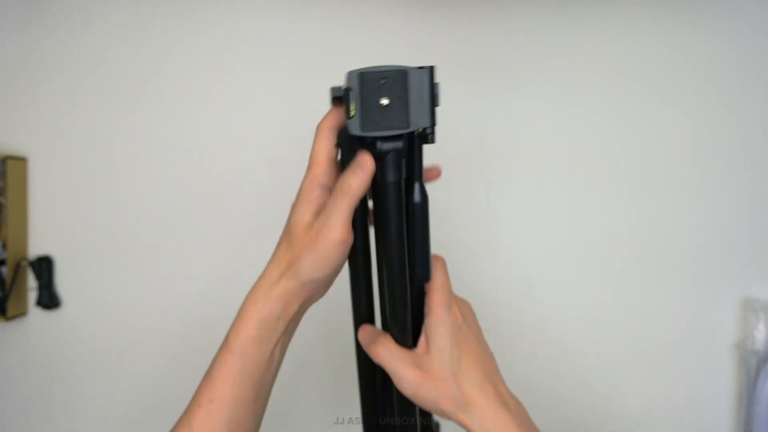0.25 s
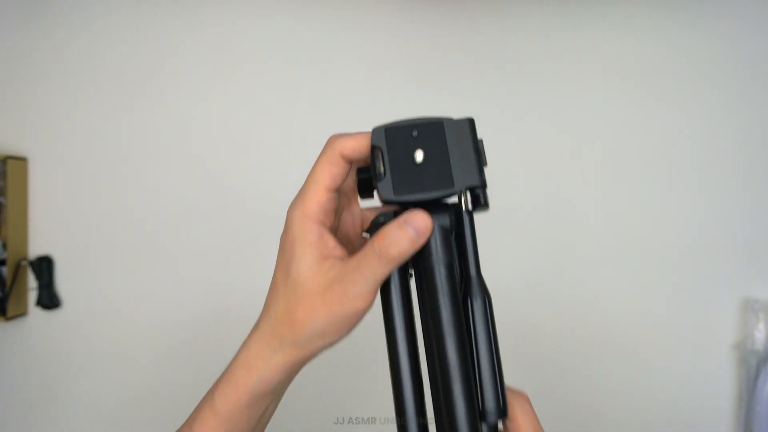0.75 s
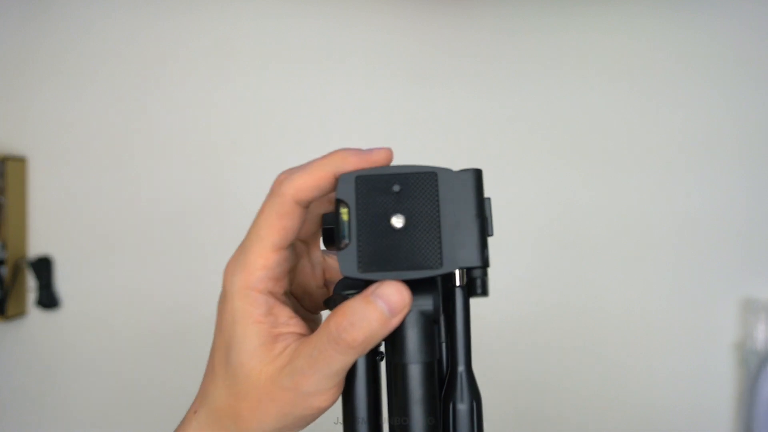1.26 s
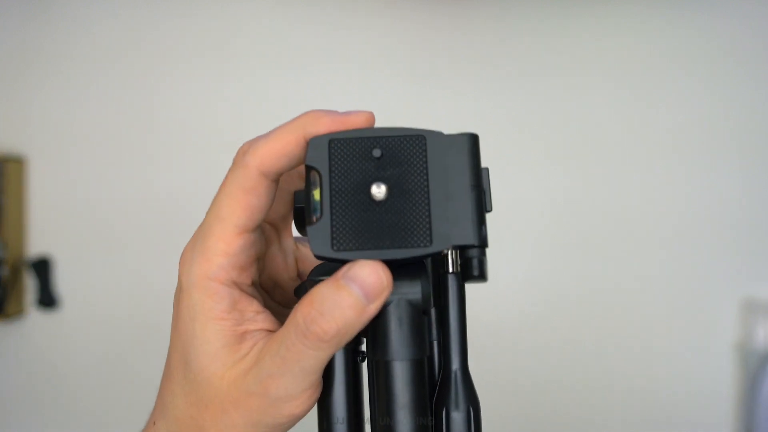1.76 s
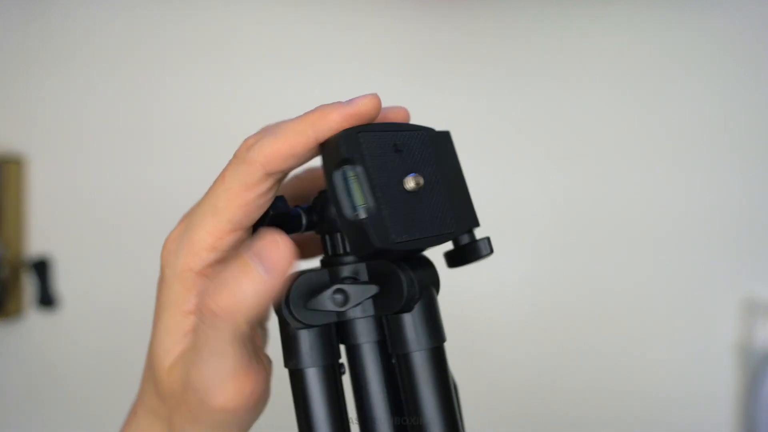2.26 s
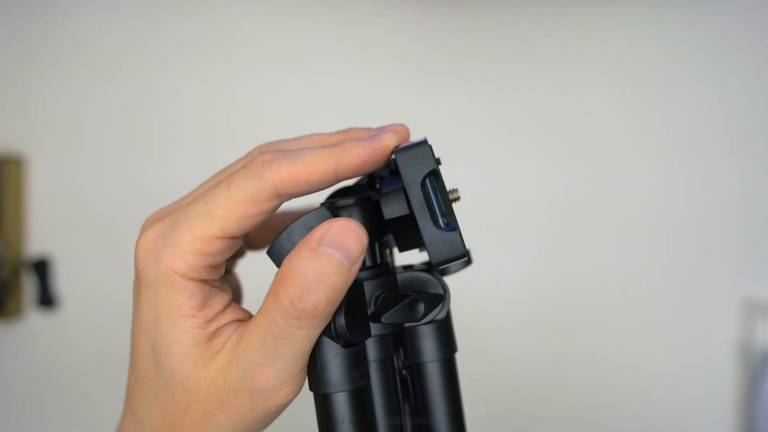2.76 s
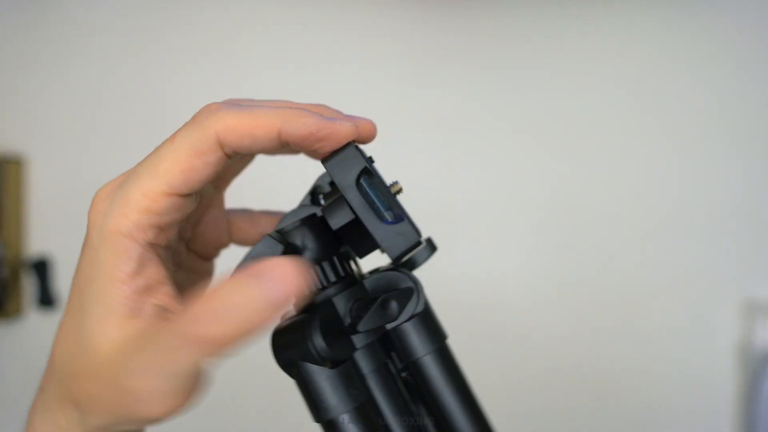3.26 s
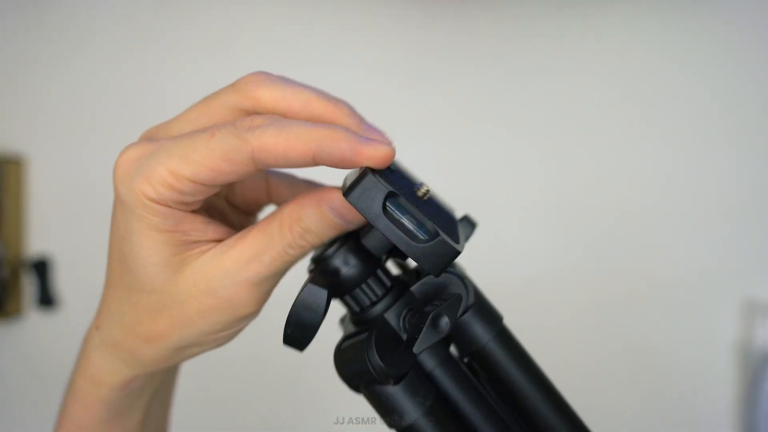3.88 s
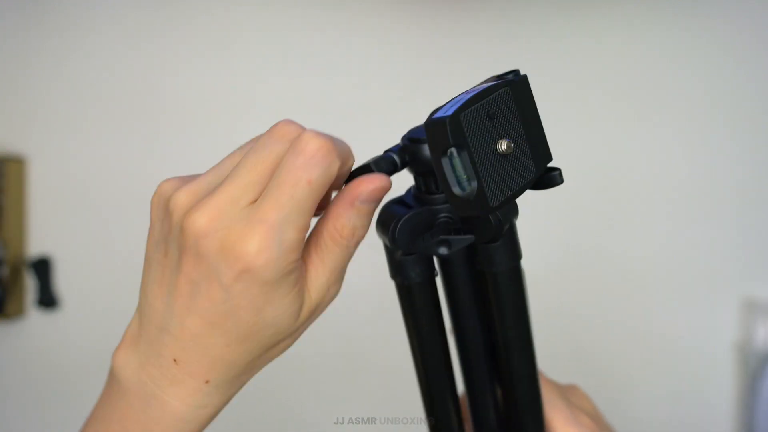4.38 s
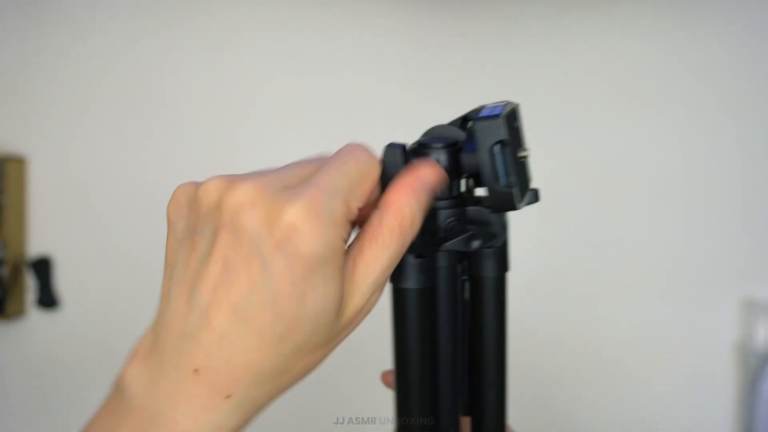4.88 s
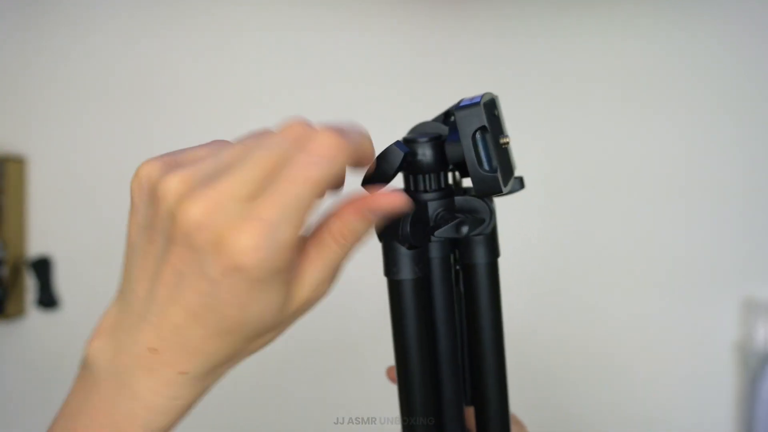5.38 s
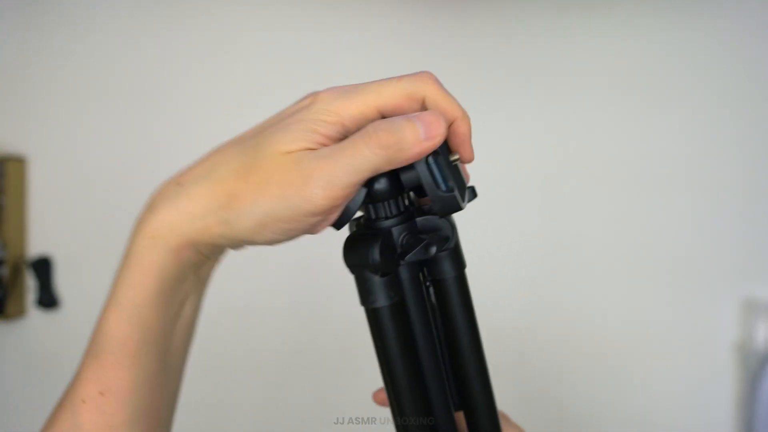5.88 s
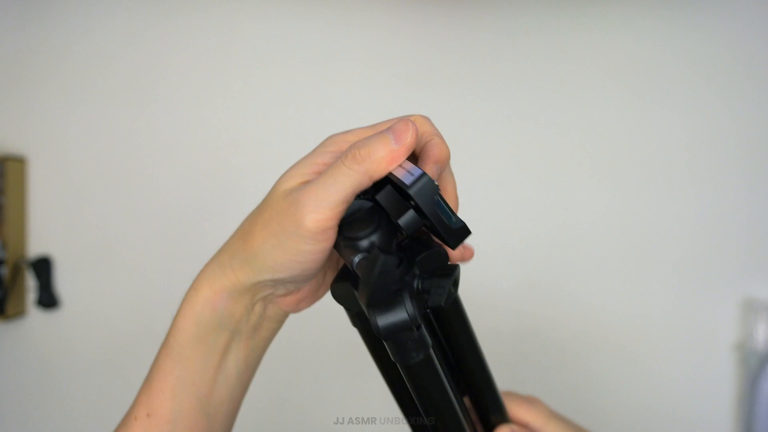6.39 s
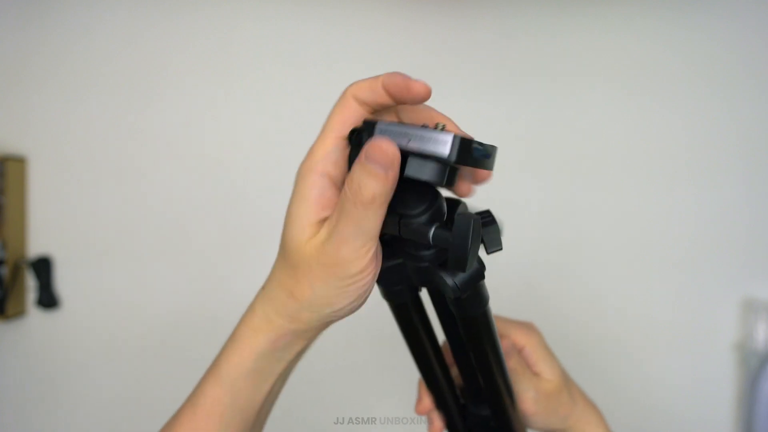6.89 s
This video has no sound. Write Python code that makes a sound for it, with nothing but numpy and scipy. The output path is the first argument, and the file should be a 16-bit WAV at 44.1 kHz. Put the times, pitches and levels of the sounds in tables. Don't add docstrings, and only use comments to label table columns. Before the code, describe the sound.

Two hands handle a folded plastic and metal tripod close to the microphone. A quick swipe and hollow clacks come in the first second, then sparse small clicks and short creaks as the head tilts. After a quieter middle with soft rubbing, a very loud knock lands past five seconds, followed by a dense run of rattles and scrapes. The quiet room is nearly dry, with faint hiss and low rumble.

```python
import sys
import numpy as np
from scipy import signal
from scipy.fft import rfft, irfft
from scipy.io import wavfile

SR = 44100
rng = np.random.default_rng(int(sys.argv[2]) if len(sys.argv) > 2 else 0)


def master(y):
    cut = np.clip(np.atleast_2d(y).T, -1, 1)
    pcm = np.round(cut * 32767)
    wavfile.write(sys.argv[1], SR, pcm.astype(np.int16))


def gain_from_decibels(decibels):
    exponent = np.asarray(decibels, float) / 20
    return 10 ** exponent


N = 314433

# f/Hz, level/dB, t60/s
TUBES = [(813, -2, 0.18), (890, -0.5, 0.064), (1094, -1.5, 0.051), (1231, 5, 0.16), (1463, -6, 0.21),
         (1702, -2.5, 0.12)]
# f/Hz, level/dB, t60/s
SHELL = [(1956, -20, 0.014), (2073, 0, 0.078), (2745, -3, 0.028), (2760, -39, 0.059), (2700, 8.5, 0.022),
         (2860, -1.5, 0.02), (3160, 0, 0.064), (3379, 3, 0.051)]
# f/Hz, level/dB, t60/s
PARTS = [(3930, -8, 0.053), (4457, -5, 0.032), (4826, -5, 0.071), (5050, -4.5, 0.017), (5070, 1, 0.0057),
         (5900, -4.5, 0.11), (6460, -30, 0.012)]
# f/Hz, level/dB, t60/s
RIBS = [(7900, 1, 0.0057), (9800, 0.5, 0.018), (10760, 2, 0.013), (12100, -23, 0.02), (13300, -7, 0.0097)]
REGIONS = [TUBES, SHELL, PARTS, RIBS]
# low f/Hz, high f/Hz
REGION_HZ = [(700, 1800), (1800, 3700), (3700, 7000), (7000, 14500)]
BROAD_DB = [-3, -6, 2.5, 5]
HELD_FROM_S = 3.6
FREE_TUBE_HZ, HELD_TUBE_HZ = 1195, 1067


def rms_one(x):
    return x / np.sqrt(np.mean(x ** 2) + 1e-20)


def band(x, low_hz, high_hz, order=2):
    return signal.sosfilt(signal.butter(order, [low_hz, high_hz], "band", fs=SR, output="sos"), x)


def one_pole(x, ms):
    r = np.exp(-1000 / (max(ms, .02) * SR))
    return signal.lfilter([1 - r], [1, -r], x)


def drift(rate):
    r = np.exp(-128 * np.pi * rate / SR)
    noise = rng.standard_normal(N // 64 + 1001)
    return rms_one(signal.lfilter([1], [1, -2 * r, r * r], noise)[1000:])


def ring(x, hz, t60):
    r, w = gain_from_decibels(-60 / (t60 * SR)), 2 * np.pi * hz / SR
    return signal.lfilter([0, np.sin(w)], [1, -2 * r * np.cos(w), r * r], x)


def spikes(s, sizes):
    out = np.full(N, 1e-18)
    out[(s * SR).astype(int)] = sizes
    return out


def hiss():
    # f/Hz, density/dB per Hz
    spectrum = [(12, -23.5), (20, -1), (101, -5), (168, -7.5), (248, -8.5), (459, -13.5), (590, -15),
                (780, -19.5), (849, -27), (923, -25.5), (1530, -15), (2320, -14.5), (2530, -16),
                (13500, -24.5), (16000, -21)]
    hz = np.maximum(np.arange(N // 2 + 1) * SR / N, 1)
    knot_hz, knot_db = np.transpose(spectrum)
    shape = gain_from_decibels(np.interp(np.log(hz), np.log(knot_hz), knot_db))
    return gain_from_decibels(-56) * rms_one(irfft(rfft(rng.standard_normal(N)) * shape, N))


def space(x):
    # delay/ms, level/dB
    echoes = [
        (6.7, -25),
        (12.5, -25),
    ]
    room_t60_s, room_db = 0.21, -16.5
    t = np.arange(SR // 2) / SR
    tail = gain_from_decibels(room_db - 60 * t / room_t60_s) * rng.standard_normal(len(t))
    response = tail * (t > .004) / np.sqrt(0.0061 * SR)
    for ms, echo_db in echoes:
        response[int(ms * SR / 1000)] += gain_from_decibels(echo_db)
    return x + one_pole(signal.fftconvolve(x, response)[:N], 0.01)


def near_spot_db(hz, spot_hz, lift_db, octaves):
    return lift_db * np.exp(-(np.log2(hz / spot_hz) / octaves) ** 2)


def held_db(hz, s):
    low_tube_hz, shift_db = 814, 6.5
    side = np.where(s > HELD_FROM_S, 1, -.5)
    held, main, low = [near_spot_db(hz, spot_hz, shift_db, octaves=0.14)
                       for spot_hz in (HELD_TUBE_HZ, FREE_TUBE_HZ, low_tube_hz)]
    return side * (held - main - low)


def patches(grains, low_hz, high_hz):
    patchy_db, patches_per_s = 5.0, 5.0
    edges = np.geomspace(low_hz, high_hz, num=5)
    out = np.zeros(N)
    for a, b in zip(edges, edges[1:]):
        swell = gain_from_decibels(patchy_db * drift(patches_per_s))
        out += np.interp(np.arange(N) / 64, np.arange(N // 64 + 1), swell) * band(grains, a, b, order=1)
    return rms_one(out)


def strokes(t, spot_hz):
    # t/s, pressure/dB, free-hanging legs/dB, skin in the contact/dB
    rub = [(0.0, -59, 1.5, 2), (0.6, -57.5, 2, -2.5), (1.15, -62.5, 0.5, -8), (1.55, -67.5, -1.5, -14),
           (2.02, -76, -5, -8), (2.36, -54.5, 3, -4), (2.54, -73.5, 1.5, 5), (2.78, -62.5, -5.5, -6),
           (3.31, -62.5, 7, -4), (3.67, -77, -2.5, 11), (4.83, -76, -1.5, -17), (5.26, -61.5, -6, -2),
           (5.48, -100, 7, -7), (5.82, -61, -8.5, -2), (6.21, -52.5, 1, -7), (6.73, -53.5, 7.5, -3),
           (6.87, -56, 3.5, -6), (7.13, -66, -3, -6)]
    # peak t/s, fade/s, level/dB, skin rel/dB, rubbed spot f/Hz
    swipes = [
        (0.299, 0.048, -38, -2, 3900),
        (3.965, 0.017, -53.5, 3, 2810),
        (4.02, 0.05, -57, -1, 3620),
        (4.507, 0.071, -52.5, 0, 3900),
        (4.966, 0.03, -45.5, 1, 3100),
        (5.01, 0.029, -44, 6, 3240),
        (5.304, 0.13, -50.5, -0.5, 3160),
        (6.15, 0.09, -51, 1, 3050),
        (6.398, 0.021, -35, -6, 2910),
    ]
    # peak t/s, swell/s, level/dB, skin rel/dB, rubbed spot f/Hz
    pushes = [
        (0.388, 0.018, -44.5, -0.5, 4030),
        (0.69, 0.045, -50, -6, 4000),
        (2.392, 0.081, -52, -17, 3180),
        (3.64, 0.039, -54, -22, 5050),
        (4.211, 0.039, -50.5, -3, 3300),
        (4.225, .06, -57.5, -11, 4930),
        (4.474, 0.08, -60.5, -15, 3030),
        (5.12, 0.13, -55.5, -26, 3350),
        (6.625, 0.067, -44, -7, 3600),
        (7.107, 0.034, -50.5, 1, 2980),
    ]
    tube_rest_db, tube_follows = -63, 0.25
    half_split_db = 1.25
    swipe_rise_s, push_stop_s, edge_db = 0.02, 0.021, 10.5
    streak_db, streak_t60_s = -5.5, 0.023
    skin_loss = 0.29

    s, *columns = np.transpose(rub)
    pressure, free, skin = [np.interp(t, s, c) for c in columns]
    tubes = tube_rest_db + tube_follows * (pressure + 60) + free
    power = gain_from_decibels([tubes, pressure - half_split_db, pressure + half_split_db, pressure + skin]) ** 2

    shapes = [(s, swipe_rise_s, fade, *rest) for s, fade, *rest in swipes]
    shapes += [(s, swell, push_stop_s, *rest) for s, swell, *rest in pushes]
    streaks, noise = 0, rng.standard_normal(N)
    for s, rise, fall, db, skin_db, hz in shapes:
        away = np.where(t < s, (s - t) / rise, (t - s) / fall)
        level = db - edge_db * away * np.maximum(away, 1)
        tilt = 10.5 * np.log2(hz / 3410)
        power += gain_from_decibels([level - 6 + free, level - tilt, level + tilt, level + skin_db]) ** 2
        spot_hz = np.where(level > pressure, hz, spot_hz)
        sing = gain_from_decibels(level + abs(tilt) + streak_db - skin_loss * skin_db)
        streaks += np.interp(np.arange(N) / SR, t, sing) * rms_one(ring(noise, hz, streak_t60_s))
    return 10 * np.log10(power), spot_hz, streaks


def rubbing():
    grip_shift_db = [3.8, 3.8, 4.5, 7.0]
    grip = .3
    grains_per_s, ticks_per_s, tick_db = 7000, 120, 17
    sample = np.arange(N)
    coarse = np.arange(N // 64 + 1) * 64
    level_db, spot_hz, streaks = strokes(coarse / SR, 3200 * 2 ** (0.25 * drift(3.04)))

    grains = gain_from_decibels(1.86 * np.minimum(rng.exponential(1, N), 5)) * rng.choice([-1, 1], N)
    grains *= rng.random(N) < grains_per_s / SR
    grains += gain_from_decibels(tick_db + 4 * rng.standard_normal(N)) * (rng.random(N) < ticks_per_s / SR)
    level_db += 2.02 * drift(60)

    out = np.zeros(N)
    for k, modes in enumerate(REGIONS):
        stroke, broad = gain_from_decibels(level_db[k]), gain_from_decibels(BROAD_DB[k])
        share = gain_from_decibels([mode_db + near_spot_db(hz, spot_hz, lift_db=13.5, octaves=0.29)
                     + held_db(hz, coarse / SR) + grip_shift_db[k] * drift(6.1)
                     for hz, mode_db, _ in modes])
        total = np.sqrt((share ** 2).sum(axis=0) + broad ** 2 * 0.54)
        for m, (hz, _, t60) in enumerate(modes):
            push = np.interp(sample, coarse, stroke * share[m] / total)
            push *= rms_one(np.roll(grains, 1511 * m + 89 * k))
            even = np.sqrt(4 * np.log(1000) / (.5 * t60 * SR))
            out += even * ring(push, hz, grip * t60)
        dense = patches(band(grains[::-1], *REGION_HZ[k]), *REGION_HZ[k])
        out += np.interp(sample, coarse, stroke * broad / total) * dense
    return gain_from_decibels(0.96) * band(out + streaks, 820, 16000)


def clack(s, peak, spot_hz, cycles):
    out, t = np.zeros(N + 2048), np.arange(2048) / SR
    for start, size, hz, count in zip((s * SR).astype(int), peak, spot_hz, cycles):
        swell = t * hz / count
        out[start:start + 2048] += size * np.e * swell * np.exp(-swell) * np.sin(2 * np.pi * hz * t)
    return out[:N]


def knocks(rows, spots_hz, focus_db, scatter_db, damping, clack_db, crack_db, crack_ms):
    trim_db = [-7, -8, -4.5, -4.5]
    contact_ms = [0.013, 0.022, 0.065, 0.011]
    crack_share = [0.6, 1.36, 0.82, 1.11]
    clack_cycles = [2.77, 3.43, 11.4, 2.2]
    s, shell_db, tubes, parts, crack = np.transpose(rows)[:5]
    region_db = [tubes, 0 * s, parts, crack]
    out = np.zeros(N)
    for k, modes in enumerate(REGIONS):
        hz, mode_db, t60 = np.transpose(modes)
        peak = gain_from_decibels(shell_db + region_db[k] + trim_db[k])

        chance = rng.standard_normal((len(s), len(hz), 2))
        lift_db = near_spot_db(hz, spots_hz[k][:, None], lift_db=focus_db[:, None], octaves=.22)
        share = gain_from_decibels(mode_db + lift_db + held_db(hz, s[:, None]) + scatter_db * chance[..., 0])
        share *= np.sign(chance[..., 1] + lift_db) / np.sqrt((share ** 2).sum(axis=1, keepdims=True))
        rung = sum(ring(spikes(s, peak * share[:, m]), hz[m], damping * t60[m]) for m in range(len(hz)))

        cycles = clack_cycles[k] * (0.85 + 0.0093 * focus_db)
        rung += gain_from_decibels(clack_db) * clack(s, peak, spots_hz[k], cycles)
        dying = one_pole(spikes(s, peak * gain_from_decibels(-.6 * focus_db)), crack_ms * crack_share[k])
        dying = one_pole(dying, 0.38) * crack_ms * SR / 1000
        noise = rms_one(band(rng.standard_normal(N), *REGION_HZ[k]))
        rung += gain_from_decibels(BROAD_DB[k] + crack_db) * dying * noise
        out += band(one_pole(rung, contact_ms[k]), *REGION_HZ[k], order=3)
    return out


def joint_slips():
    # t/s, shell peak/dB, leg tubes rel/dB, small parts rel/dB
    hinge = [(0.1845, -51, -17, -8), (0.2263, -36.5, -10, -17), (0.2437, -37, -4, -20),
             (1.2137, -33, -8, -2), (1.3331, -42.5, -6, -10), (1.3644, -46, -9, -1), (1.4694, -51, -15, 7),
             (1.5978, -37, -9, -2.5), (1.718, -37, -17, -3), (2.0643, -34, -22, -4), (2.145, -38, -14, -7),
             (2.4444, -33.5, -15, -8), (2.4744, -28, -21, -6), (2.4986, -31.5, -14.5, -2.5),
             (2.8628, -40.5, -5, 4), (3.0925, -35, -10, -15), (3.2354, -47, -10, 8), (3.276, -32, -9, -5),
             (3.3268, -32, -22, -12), (3.4935, -32.5, -4, -4), (6.014, -44, -1, 1)]
    # t/s, shell peak/dB, leg tubes rel/dB, small parts rel/dB
    ball = [(0.2085, -48, -1, -16), (0.8273, -29.5, -13.5, -19), (1.0762, -28.5, -12.5, -9.5),
            (2.0462, -38.5, -19, -8), (2.0885, -40, -17, -10), (2.7916, -31.5, -11.5, -6.5),
            (3.2114, -34.5, -7, -8), (3.3077, -27, -12.5, -10), (4.356, -33, -17, -10.5),
            (4.4218, -33.5, -21, -12.5), (4.5017, -34, -11.5, -14), (4.7457, -29, -37, -5.5),
            (4.7672, -36.5, -39, -1.5), (4.83, -42, -30, -2), (4.9677, -41.5, -22, 10.5),
            (6.1744, -18.5, -25, -18), (6.2886, -27, -31, -27), (6.3026, -23.5, -21, -18),
            (6.319, -26, -24, -16)]
    # t/s, shell peak/dB, leg tubes rel/dB, small parts rel/dB
    plate = [(1.1755, -37, -26, -5), (1.27, -44.5, -1.5, -14), (1.4487, -41.5, -15, -5),
             (1.4905, -44, -10, 0.5), (1.5236, -38, -11.5, -6), (1.7999, -39, -4.5, -7),
             (2.8449, -34.5, -22, -5), (2.9824, -38, -21, -13), (3.0115, -37.5, -13, -11),
             (3.413, -33.5, -13, -3), (5.227, -34, -15, -5), (5.9953, -32, -13, -7),
             (6.2542, -31, -12, -11), (6.6827, -25.5, -12, -2.5), (6.7083, -28.5, -6, 1),
             (6.7243, -31.5, -5.5, -1), (6.733, -37, -15, 4), (6.7165, -35, -15, -3), (6.648, -40, -8, 3),
             (6.815, -46, -3, -4), (6.755, -28.5, -8.5, -1)]
    # t/s, shell peak/dB, gap/s, shell pitch f/Hz
    creaks = [
        (2.9303, -34.5, 0.0098, 3100),
        (3.0679, -34, 0.0088, 2870),
        (3.1296, -33.5, .011, 2160),
    ]
    pitch_hz = [2046, 2875, 3300]
    joint_crack_db = [-13, -6.5, -9.5]
    creak_tubes_db, creak_parts_db = -13.5, -7.5

    rows = []
    for table, hz, crack_db in zip([hinge, ball, plate], pitch_hz, joint_crack_db):
        rows += [(*row, row[3] + crack_db, hz) for row in table]
    creak_crack_db = creak_parts_db + joint_crack_db[0]
    for s, db, gap, hz in creaks:
        rows += [(s + k * gap, db, creak_tubes_db, creak_parts_db, creak_crack_db, hz) for k in range(3)]
    rows = np.array(rows)

    joint_hz = rows[:, 5]
    tube_hz = np.where(rows[:, 0] > HELD_FROM_S, HELD_TUBE_HZ, FREE_TUBE_HZ)
    return knocks(rows, [tube_hz, joint_hz, 1.7 * joint_hz, 4.6 * joint_hz], 0 * joint_hz + 4.9,
                  scatter_db=2.0, damping=0.86, clack_db=-9, crack_db=5.5, crack_ms=4.4)


def knob_thud():
    click = spikes(np.array([5.380]), gain_from_decibels(-40.5))
    return ring(one_pole(click, 0.21), hz=520, t60=0.082)


def firm_knocks():
    # tube pitch f/Hz, shell pitch f/Hz, part pitch f/Hz, leg tubes rel/dB, focus/dB
    spots = [(1245, 2850, 4300, -17, 17), (859, 2700, 5200, -12, -0.5), (1260, 2500, 5000, -16, 24),
             (1170, 2030, 2200, -15, 1.5), (1330, 2880, 4500, -17, -6), (1560, 3110, 4970, -15, 1.5),
             (920, 2960, 3800, -22.5, 0), (1100, 2000, 4780, -0.5, -2), (1090, 1960, 5100, -9.5, 2),
             (1310, 2560, 3900, -15, -1), (763, 2000, 1400, -1.5, -6), (994, 2090, 6600, -6.5, 0),
             (1320, 3130, 4800, -18.5, 4)]
    # t/s, shell peak/dB, small parts rel/dB, crack rel/dB
    blows = [
        [(0.5559, -13.5, -18.5, -26), (0.9465, -7, -16.5, -35)],
        [(0.4199, -25.5, -25, -31), (1.0121, -18, -17.5, -38)],
        [(0.8445, -28, 10.5, -20)],
        [(1.2925, -34.5, 3, -12), (3.3798, -27, 1, -13), (3.5034, -25.5, 4.5, -7.5)],
        [(3.2199, -27.5, -7, -21), (3.4271, -25.5, -4.5, -12), (5.4158, -23, -9, -14), (5.903, -16.5, -8, -20)],
        [(5.235, -23, -10, -15.5), (6.4038, -18, -18, -22)],
        [(5.3757, -3, -9, -18)],
        [(6.0447, -19, 7, -16.5)],
        [(6.3767, -19, 2, -14)],
        [(6.1854, -17, 4, 0), (6.326, -24, -5, -22)],
        [(6.7905, -33, 5.5, -8), (6.8942, -35, 10, -1)],
        [(6.8751, -27, 3.5, -5)],
        [(6.4241, -20, -7.5, -11.5), (5.4415, -29, -6, -26)],
    ]
    rows = np.array([(s, db, tubes, parts, crack, *pitches_hz, focus)
                     for (*pitches_hz, tubes, focus), hits in zip(spots, blows)
                     for s, db, parts, crack in hits])
    tube_hz, shell_hz, part_hz, focus_db = rows[:, 5:].T
    out = knocks(rows, [tube_hz, shell_hz, part_hz, 2 * part_hz], focus_db,
                 scatter_db=3.5, damping=0.61, clack_db=2.5, crack_db=0.0, crack_ms=3.57)
    return out + gain_from_decibels(-23) * np.roll(out, -int(0.0049 * SR))


def scene():
    tripod = rubbing() + joint_slips() + knob_thud() + firm_knocks()
    mono = space(tripod) + hiss()
    stray = mono * rng.choice([-1, 1], N)
    side = gain_from_decibels(-30) * band(stray, 10000, 16000, order=3)
    side += gain_from_decibels(-36) * band(stray, 1200, 11000)
    side += gain_from_decibels(-24) * band(stray, 12, 50)
    return np.array([mono + side, mono - side])


def roll_off(x):
    return signal.sosfilt(signal.butter(12, 16500, fs=SR, output="sos"), x)


def record(dry):
    cut = signal.sosfilt(signal.ellip(10, .5, 45, 15800, fs=SR, output="sos"), dry)
    return roll_off(cut)


dry = scene()
out = record(dry)
master(out)
```